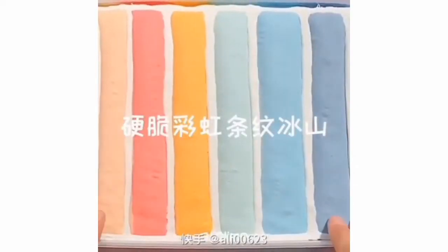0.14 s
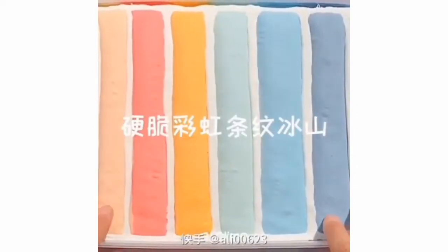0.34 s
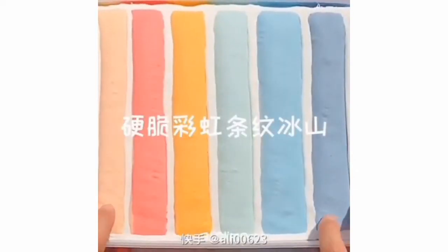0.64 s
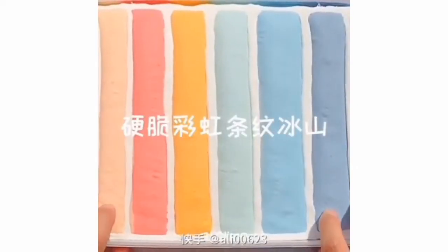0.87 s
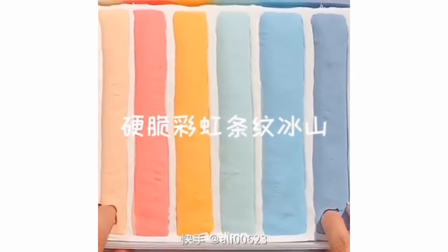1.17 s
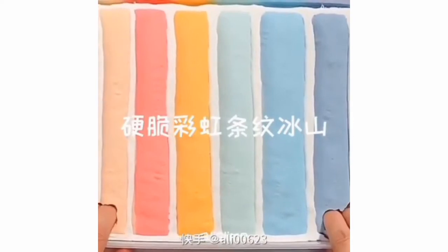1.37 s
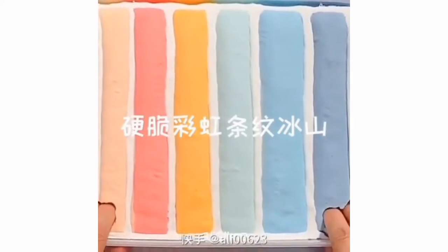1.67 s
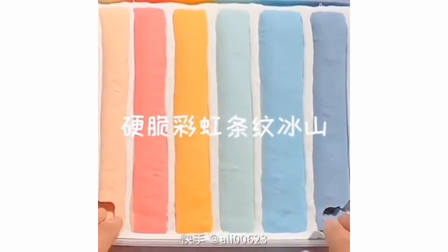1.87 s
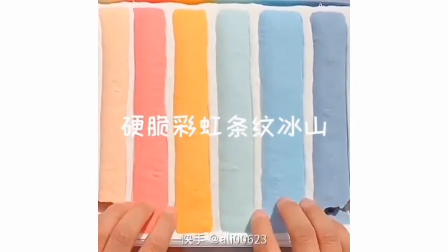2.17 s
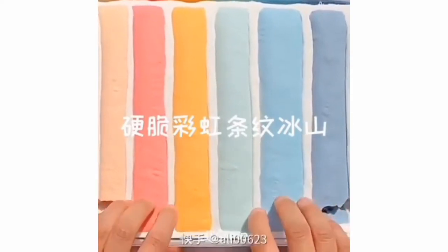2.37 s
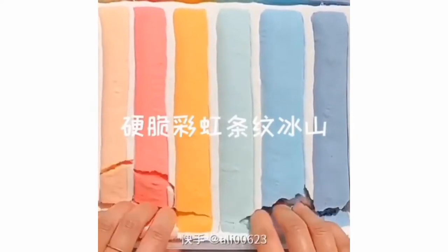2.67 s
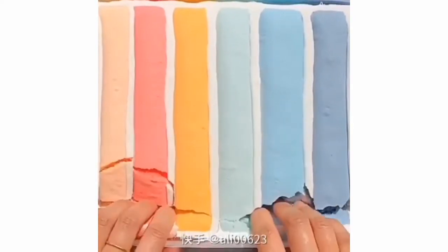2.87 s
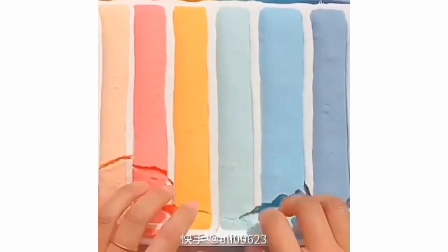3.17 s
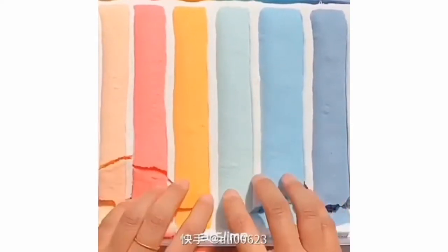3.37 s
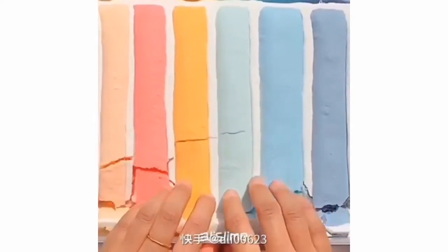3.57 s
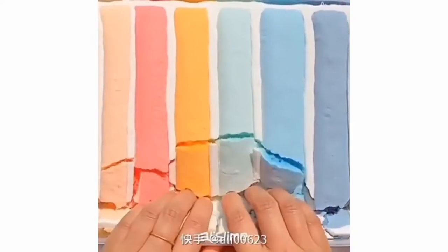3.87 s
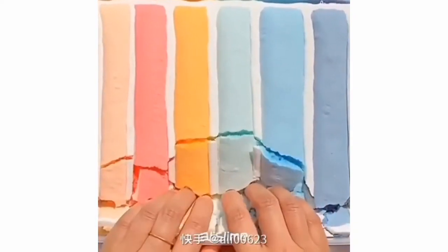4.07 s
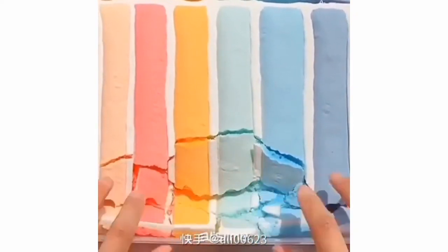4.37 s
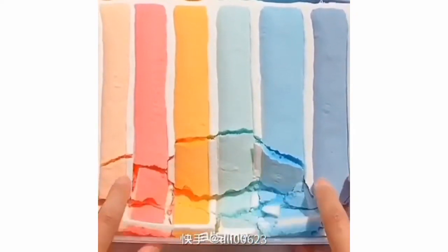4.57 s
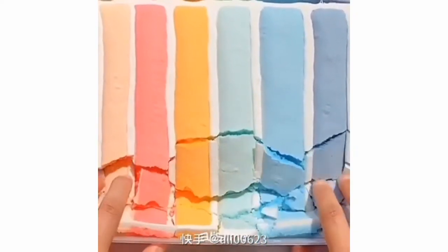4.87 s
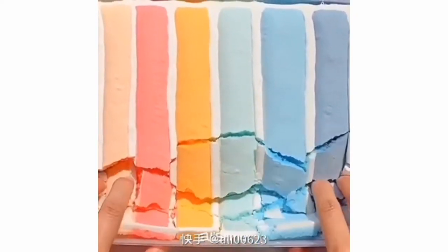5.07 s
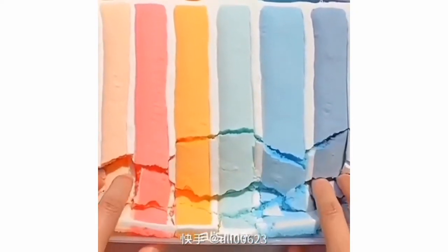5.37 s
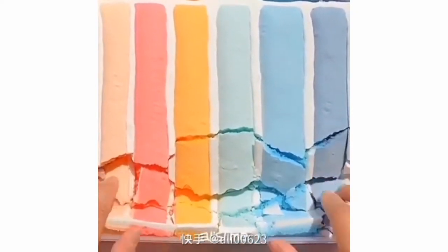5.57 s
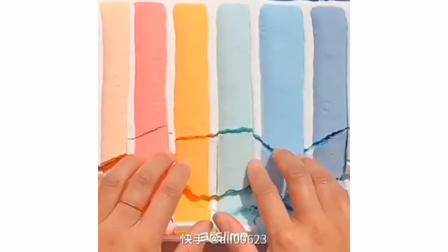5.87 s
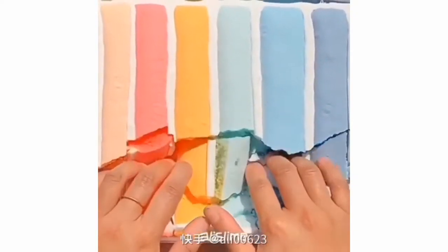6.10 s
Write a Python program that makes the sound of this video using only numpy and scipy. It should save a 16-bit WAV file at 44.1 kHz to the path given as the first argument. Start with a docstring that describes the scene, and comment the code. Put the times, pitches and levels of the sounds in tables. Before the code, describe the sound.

Very close in a quiet room, fingers press into a tray of crusted slime. A fine fizz swells, then the crust breaks in a cluster of crisp snaps and low thuds, crumbling away quickly. Five such bursts follow, separated by near silence with faint finger rubs and stray ticks. The table trembles softly underneath. Two close microphones give an intimate stereo picture.

```python
"""At a table in a quiet room, fingertips press five times into the dried crust of a tray of slime.
The crust fizzes under load and snaps: snaps are clicks stretched into falling chirps, with low thuds and hiss.
Crackle and fizz are thousands of tiny ringing flakes; rubbing and peeling fingers stir them between presses.
A low murmur is wide room hush when faint and the slab creaking near the fingers when loud.
The table wobbles near 70 Hz, and two close microphone ports hear it all over a soft hush."""
import sys
import numpy as np
from scipy import signal
from scipy.fft import rfft, irfft, next_fast_len
from scipy.io import wavfile

SR = 44100
rng = np.random.default_rng(int(sys.argv[2]) if len(sys.argv) > 2 else 0)


def inscribe(sig):
    """Save sig as 16-bit PCM at rate SR to the path in sys.argv[1].

    A 1-D sig is mono; a 2-D sig holds one channel per row.
    Samples are clipped to [-1, 1] before scaling.
    """
    pcm = np.round(np.clip(np.atleast_2d(sig).T, -1, 1) * 32767)
    wavfile.write(sys.argv[1], SR, pcm.astype(np.int16))


N = 275184  # samples in the scene

TRAVEL_S = 0.00602  # travel delay of 300 Hz; higher pitches take less


def crack(hz, octaves):
    """One fracture: a click coloured around hz whose treble travels fastest; peak 1, 64 samples of lead-in."""
    f = np.fft.rfftfreq(1024, 1 / SR) + 1
    colour = from_db(-12 * (np.log2(f / hz) / octaves) ** 2)
    # the second term moves the whole chirp earlier, to the front of the block
    travel = np.sqrt(300 * f) - 20 * f / np.sqrt(f[-1])
    wave = irfft(colour * np.exp(-4j * np.pi * TRAVEL_S * travel))
    return np.roll(wave, 64) / np.abs(wave).max()


# Snaps that stand out, levels before the small trims in snaps():
# (t/s, crack level/dB, crack f/Hz, thud f/Hz, thud level/dB, splinter hiss level/dB, tear length/s)
BIG_SNAPS = [(.51, -54, 1780, 288, -48, -73, 0.0058), (.854, -41, 1000, 630, -69.5, -66, .003),
             (.894, -36.5, 1260, 324, -39, -53, 0.0044), (.908, -35.5, 1197, 466, -32.5, -45.5, 0.0068),
             (.932, -39, 1660, 334, -51, -49, .01), (.946, -22.5, 1550, 319, -39, -31.5, 0.016),
             (.956, -35, 1620, 306, -23, -37, 0.0047), (.969, -32, 1243, 564, -35.5, -50, 0.0034),
             (.99, -43, 1490, 452, -39, -47, 0.019), (1.014, -22, 1552, 603, -30.5, -31.5, 0.0097),
             (1.088, -42.5, 1710, 554, -49, -62, .0083), (1.101, -45, 1250, 322, -40, -59.5, 0.0032),
             (1.498, -57, 1680, 384, -59.5, -74, 0.0087), (1.595, -50, 1430, 363, -53, -67.5, 0.01),
             (1.617, -51, 1200, 444, -47, -62, 0.0097), (1.644, -50.5, 1550, 460, -58, -57, 0.011),
             (1.872, -82, 860, 367, -48.5, -71, 0.006), (2.008, -50.5, 1445, 234, -40, -54.5, 0.0059),
             (2.156, -47, 1457, 410, -37, -54, 0.0032), (2.163, -34.5, 1230, 232, -37.5, -52, 0.0096),
             (2.175, -23.5, 1195, 344, -24.5, -40.5, .0043), (2.219, -24, 1171, 393, -21.5, -39.5, 0.0073),
             (2.228, -35, 1138, 407, -23, -38.5, 0.0031), (2.252, -18, 1417, 587, -24, -26, .012),
             (2.267, -29, 1193, 327, -20.5, -38.5, 0.0036), (2.306, -49.5, 1340, 345, -37.5, -62.5, 0.0047),
             (2.35, -47, 1480, 525, -42.5, -48, .0044), (3.073, -52.5, 1127, 273, -44, -65.5, .01),
             (3.14, -58, 1586, 248, -46, -63, 0.0058), (3.205, -53, 1553, 590, -48.5, -64, 0.0016),
             (3.266, -44.5, 1201, 313, -62, -74, 0.0029), (3.309, -49, 1260, 393, -41, -58.5, 0.0049),
             (3.363, -23.5, 1283, 320, -31.5, -37, 0.0086), (3.411, -17.5, 1500, 323, -18, -30.5, 0.011),
             (3.417, -16, 1317, 405, -17, -33, 0.0066), (3.438, -22, 1640, 323, -30.5, -40, 0.005),
             (3.443, -22, 1750, 324, -26, -38, .014), (3.463, -27, 1516, 313, -25, -35, 0.0067),
             (3.501, -31.5, 1060, 322, -33, -50.5, 0.0058), (3.521, -37.5, 1890, 340, -52.5, -53.5, .0039),
             (3.565, -51, 1480, 447, -56, -63, 0.019), (3.594, -58, 1310, 215.5, -43, -70.5, 0.0043),
             (3.825, -48.5, 937, 262, -51.5, -83, .006), (4.016, -46, 1184, 374, -48, -66.5, .017),
             (4.056, -49, 1136, 414, -48, -76, .011), (4.279, -54.5, 1080, 319, -32, -57.5, 0.005),
             (4.351, -55, 1750, 228, -56.5, -73, .0064), (4.528, -48.5, 1910, 340, -41.5, -58, 0.0043),
             (4.568, -36, 1418, 496, -42.5, -40, 0.007), (4.587, -22, 2130, 364, -30.5, -28, 0.0087),
             (4.599, -27, 1470, 353, -28, -48, 0.0061), (4.622, -31, 1138, 344, -31, -37.5, .0093),
             (4.629, -20, 985, 452, -22.5, -39, 0.0036), (4.639, -33.5, 1610, 346, -42.5, -45.5, 0.0057),
             (4.674, -19.5, 1164, 312, -18.5, -32.5, 0.0063), (4.745, -49, 1624, 313, -47.5, -63, 0.014),
             (4.825, -26, 1190, 315, -26.5, -34.5, 0.0039), (5.308, -67, 1984, 338, -59.5, -60, 0.006),
             (5.332, -48, 1110, 391, -49.5, -70.5, 0.0078), (5.584, -57, 1300, 428, -53.5, -72, 0.019),
             (5.703, -19.5, 1500, 360, -18, -28.5, 0.007), (5.712, -19, 894, 318, -19.5, -34, .0058),
             (5.729, -60, 1290, 327, -29, -52, 0.0049), (5.759, -49, 1680, 334, -39, -63, .007),
             (5.781, -40, 1290, 322, -49.5, -57, 0.0044), (5.804, -37, 1240, 377, -43, -50, 0.024),
             (5.819, -13.5, 1890, 428, -18.5, -27, 0.0033), (5.887, -30, 1200, 310, -36.5, -56, .004),
             (5.927, -37.5, 1440, 250, -45, -67, .003), (5.949, -52, 1410, 241, -47, -70, .004),
             (6.135, -45.5, 1240, 580, -63, -59, 0.0039)]
# Colour of fine fizz and splinters: (f/Hz, level/dB)
FIZZ_COLOUR = [(2000, -0.5), (3200, -0.5), (3830, 2.5), (4600, 0.5), (5600, -3.5), (6300, -2.5),
               (7200, -3.5), (8500, -1.5), (11000, -10), (12800, -8), (14000, -6)]
FRACTURE_GAP_S, THUD_LAG_S = 0.002, 0.0012  # mean gap between fractures; thud starts after the crack
# faint cracks have a narrower colour, strong ones the full width
FAINT_DB, FULL_DB, FAINT_OCTAVES, FULL_OCTAVES = -42, -28, 0.55, 0.71


def snaps(rows, count=10):
    """A tear is a row of fractures, led by the largest, with a thud of the slab and a puff of splinters."""
    cracks, thuds, puffs = np.zeros((3, N + SR))
    t = np.arange(SR // 12) / SR
    chance = rng.random((len(rows), 4, count))
    order = np.arange(count)
    for row, (when, size, sign, tint) in zip(rows, chance):
        s, crack_db, crack_hz, thud_hz, thud_db, hiss_db, length = row
        length = np.clip(length, 0.001, 0.03)
        late = (order + 0.8 * when * (order > 0)) * FRACTURE_GAP_S
        octaves = np.interp(crack_db, [FAINT_DB, FULL_DB], [FAINT_OCTAVES, FULL_OCTAVES])

        for k in np.flatnonzero(late < 0.8 * length):
            at = round((s + late[k]) * SR) - 64  # allow for the lead-in
            level_db = crack_db - 2.0 - 4.0 * size[k] * (k > 0)
            gain = from_db(level_db) * np.sign(sign[k] - 0.5)
            # each later piece has its own size, so its own pitch
            piece_hz = crack_hz * 2 ** (1.55 * (tint[k] - 0.5) * (k > 0))
            cracks[at:at + 1024] += gain * crack(piece_hz, octaves)

        rise_and_fade = t / (0.52 * length) * np.exp(1 - t / (0.46 * length))
        # the thud starts high and settles on the slab's pitch
        phase = 2 * np.pi * thud_hz * (t + 0.0012 * (1 - np.exp(-t / 0.003)))
        thud = rise_and_fade ** 2.43 * np.sin(phase + 2 * np.pi * sign[0])
        start = round((s + THUD_LAG_S) * SR)
        thuds[start:start + len(t)] += from_db(thud_db + 1.5) * thud

        start = round((s - 0.002) * SR)  # splinters fly just before the break
        puffs[start:start + len(t)] += (from_db(hiss_db - 3.5) * rise_and_fade) ** 2

    splinters = rms_one(flakes(grains(12000, spread_db=3.0), FIZZ_COLOUR)) * np.sqrt(puffs[:N])
    return cracks[:N] + thuds[:N] + splinters


SMALL_SNAPS_PER_S, SMALL_SPREAD_DB = 22, 5
SMALL_OVER_DB = (8, 9, -0.5)  # most that crack, thud and hiss are set over crackle, murmur and fizz
SMALL_UP_TO_DB = -56  # under more strain than this the small breaks grow no further


def small_snaps(load_db):
    """Small breaks come at random, and grow with the strain of the moment up to a limit."""
    count = int(SMALL_SNAPS_PER_S * N / SR)
    when, size, crack_pitch, thud_pitch, length = rng.random((count, 5)).T
    s = 0.01 + when * (N / SR - 0.02)
    strain_db = np.minimum(load_db[:, (s * SR).astype(int)], SMALL_UP_TO_DB)
    levels_db = strain_db + np.array(SMALL_OVER_DB)[:, None] - SMALL_SPREAD_DB * size
    crack_db, thud_db, hiss_db = levels_db
    crack_hz = 1100 + 700 * crack_pitch
    thud_hz = 230 + 270 * thud_pitch
    length_s = 0.004 + 0.01 * length ** 2
    return list(zip(s, crack_db, crack_hz, thud_hz, thud_db, hiss_db, length_s))


# Colour of the crackle in the middle of the range: (f/Hz, level/dB)
CRACKLE_COLOUR = [(300, -24.5), (700, 4.5), (1200, 6.5), (2000, 1.5), (3200, -9.5), (5000, -42.5),
                  (8000, -38.5)]


def loaded_crust(load_db):
    """Countless small fractures in clumps: crackle in the middle, fine fizz on top."""
    crackle_db, _, fizz_db = load_db
    slow_noise = through(rng.standard_normal(N), lambda hz: 1 / (1 + (hz / 40) ** 2))
    clumps = from_db(2.0 * rms_one(slow_noise))
    # a light touch rubs finely; under heavy load the crust crumbles in coarse shards
    coarse = np.clip((crackle_db + 62) / 14, 0, 1)
    rubbing = rms_one(flakes(grains(8000, spread_db=2.5), CRACKLE_COLOUR, cycles=19.0))
    shards = rms_one(clumps * flakes(grains(700, spread_db=5.0), CRACKLE_COLOUR, cycles=16.0))
    mix = np.sqrt(1 - 0.8 * coarse) * rubbing + np.sqrt(0.8 * coarse) * shards
    fine = rms_one(clumps * flakes(grains(14000, spread_db=-1.5), FIZZ_COLOUR, cycles=40.0))
    return from_db(crackle_db) * mix + from_db(fizz_db) * fine


# Colour of the low murmur: (f/Hz, level/dB)
MURMUR_COLOUR = [(100, -4), (200, 3.5), (330, 2), (500, -2), (700, -5.5), (1100, -48.5)]


def low_murmur(load_db):
    """When faint, mostly the wide hush of the room; when loud, the slab creaking near the fingers."""
    murmur_db = load_db[1]
    mid, side = (rms_one(bending(grains(900, spread_db=3.5), MURMUR_COLOUR, TRAVEL_S)) for _ in range(2))
    wide_db = -np.clip(0.45 * (murmur_db + 66), 0, 12)  # louder is narrower
    return from_db(murmur_db) * spread(mid, from_db(wide_db) * side)


# Strain of the crust through each of the five presses:
# (t/s, crackle level/dB, low murmur level/dB, fizz level/dB)
PRESS_CURVES = [
    [(.27, -95, -85, -81), (.32, -88, -96, -74.5), (.52, -75.5, -84, -65.5), (.66, -70, -75, -61.5),
     (.72, -60, -65, -54), (.78, -59, -63, -53), (.86, -63, -69, -60.5), (.96, -49.5, -43, -47),
     (1.15, -64, -64, -65.5), (1.21, -74, -63.5, -80), (1.31, -87, -83, -100)],
    [(1.98, -97, -85, -80), (2.02, -75, -69, -69.5), (2.14, -67, -72.5, -61.5), (2.25, -48, -52.5, -45.5),
     (2.3, -52, -51.5, -53.5), (2.48, -72, -65, -80), (2.61, -81.5, -69, -101)],
    [(3.05, -91, -84.5, -90), (3.12, -76, -65.5, -77), (3.2, -69, -67.5, -72), (3.27, -63, -64, -64),
     (3.3, -57, -56, -55), (3.4, -52, -52, -51), (3.51, -47, -50, -54), (3.54, -58.5, -57, -63),
     (3.62, -66.5, -60, -95), (3.78, -86.5, -73.5, -100)],
    [(4.4, -78, -76.5, -74), (4.45, -68.5, -67.5, -67.5), (4.56, -47, -51, -49), (4.66, -54, -49, -49),
     (4.72, -50, -45, -54), (4.77, -53, -59, -56.5), (4.83, -55, -50, -55), (4.9, -75, -64, -88),
     (4.96, -66.5, -64.5, -72.5), (5.05, -90, -74, -99)],
    [(5.51, -85, -86, -81), (5.58, -66.5, -63.5, -68.5), (5.64, -64, -62.5, -68.5), (5.7, -51, -51, -43),
     (5.77, -56, -49, -54), (5.84, -50, -49, -51), (5.9, -56, -52, -57), (6.0, -68.5, -62, -68.5),
     (6.06, -73.5, -70.5, -82), (6.12, -77, -78, -95)],
]
# Fingers rub or peel off: (t/s, held/s, crackle level/dB, low murmur level/dB, fizz level/dB)
FINGER_RUBS = [(.18, 0.024, -76.5, -66, -94), (.52, .04, -78, -63, -82), (1.601, 0.056, -65, -65, -70),
               (1.88, 0.017, -75.5, -64, -84), (2.719, 0.027, -63.5, -65.5, -70.5),
               (2.8, 0.11, -74, -72.5, -73), (3.09, 0.017, -88, -59, -85),
               (4.008, 0.048, -59.5, -57, -62.5), (4.27, 0.024, -73.5, -62.5, -75.5),
               (4.36, 0.0081, -70.5, -66.5, -72.5), (5.33, .025, -63, -60, -70.5),
               (6.15, .1, -62.5, -59, -64.5)]
RUB_RISE_DB_PER_S, RUB_FALL_DB_PER_S = 292, 341
# the triples below: crackle, murmur, fizz
REST_DB = (-87.5, -73.5, -99.5)  # steady level under everything
CRUMBLE_DB = (-20.5, -16.5, -14.5)  # after a snap, against its crack, thud and hiss
CRUMBLE_T60_S = (0.09, 0.13, 0.24)  # time to sink 60 dB
STRAIN_DB, STRAIN_T60_S = -1, 0.055  # swell before a snap: level against the crumble, time to climb 60 dB


def load():
    """Power of crackle, murmur and fizz adds up from rest, presses, rubs and the time around big snaps; in dB."""
    power = from_db(REST_DB)[:, None] ** 2 * np.ones(N)
    t = np.arange(N) / SR
    for press in PRESS_CURVES:
        pressed = (t > press[0][0]) & (t < press[-1][0])
        power += from_db(in_time(press)) ** 2 * pressed
    for s, held, *db in FINGER_RUBS:
        shape_db = swell(s, held, RUB_RISE_DB_PER_S, RUB_FALL_DB_PER_S)
        power += from_db(db)[:, None] ** 2 * from_db(shape_db) ** 2

    rows = np.array(BIG_SNAPS)
    at = (rows[:, 0] * SR).astype(int)
    for layer, column in enumerate([1, 4, 5]):  # crack, thud and hiss levels
        kicks = np.zeros(N)
        kicks[at] = from_db(rows[:, column] + CRUMBLE_DB[layer]) ** 2
        crumble = dying(kicks, CRUMBLE_T60_S[layer])
        strain = dying(kicks[::-1], STRAIN_T60_S)[::-1]  # run backwards, so it climbs to the snap
        power[layer] += crumble + from_db(STRAIN_DB) ** 2 * strain
    return 10 * np.log10(power)


# Colour of the table's trembling: (f/Hz, level/dB)
TABLE_COLOUR = [(20, -40), (40, 1), (60, 8), (70, 11), (82, -0.5), (120, 2), (200, -46)]
# The hands shove the table: (t/s, level/dB)
TABLE_SHOVES = [(0.0, -57), (.1, -58), (.57, -63), (.96, -48), (1.04, -58), (1.94, -62.5), (2.26, -50),
                (2.36, -55.5), (2.66, -60), (2.88, -66), (3.09, -61.5), (3.44, -48.5), (3.58, -57),
                (3.7, -60), (4.31, -61.5), (4.59, -48), (4.72, -48), (4.86, -52), (5.02, -64.5),
                (5.76, -57), (5.84, -50)]
SHOVE_RISE_DB_PER_S, SHOVE_FALL_DB_PER_S, TABLE_REST_DB = 350, 129, -66.5
# one jolt late in the first press sets the table ringing; the level is before the soft start
JOLT_AT_S, JOLT_DB, JOLT_HZ, JOLT_T60_S = 1.05, -39, 72, 0.6


def table():
    """The table trembles at its low mode and rings out once after a jolt."""
    tremble = rms_one(through(rng.standard_normal(N), lambda hz: from_db(at_hz(TABLE_COLOUR, hz))))
    t = np.maximum(np.arange(N) / SR - JOLT_AT_S, 0)
    fade = from_db(JOLT_DB - 60 * t / JOLT_T60_S)
    soft_start = 1 - np.exp(-t / 0.025)
    jolt = fade * soft_start * np.sin(2 * np.pi * JOLT_HZ * t)
    power = from_db(TABLE_REST_DB) ** 2
    for at, db in TABLE_SHOVES:
        power = power + from_db(db + swell(at, 0, SHOVE_RISE_DB_PER_S, SHOVE_FALL_DB_PER_S)) ** 2
    return np.sqrt(power) * tremble + jolt


# Left port over right port: (f/Hz, level/dB)
PORT_TILT = [(60, 0), (130, -.5), (280, -3), (620, -5.5), (1340, 0.7), (2900, -1), (6400, -0.4),
             (13800, 0.5)]
# Phase by which the left port leads: (f/Hz, lead/radians)
PORT_PHASE = [(100, .05), (350, .15), (700, .55), (1210, .05), (3000, .4), (4650, 1.5), (5300, .2),
              (9000, 1.5), (10500, .2)]
# Scattered sound that differs between the ports: (f/Hz, level/dB)
PORT_SCATTER = [(30, -18), (100, -25), (350, -27), (700, -19), (1300, -25), (2500, -13), (5000, -5),
                (9000, -3), (13000, -8)]


def ports(x, shift_hz=60):
    """Two ports hear one wave with a tilt in level and phase, plus ever-changing scatter from hands and tray."""
    def left(hz):
        return from_db(at_hz(PORT_TILT, hz) / 2) * np.exp(0.5j * at_hz(PORT_PHASE, hz))

    shifting = rms_one(through(rng.standard_normal(N), lambda hz: 1 / (1 + (hz / shift_hz) ** 2)))
    scatter = through(x * shifting, lambda hz: from_db(at_hz(PORT_SCATTER, hz)))
    right_wave = through(x, lambda hz: 1 / left(hz))
    return np.array([through(x, left) + scatter, right_wave - scatter])


ROOM_T60_S, ROOM_DB, WALL_CUT_HZ = 0.25, -16, 5000  # level is before widening


def room(x):
    """Dense dull reflections: noise that dies away, of unit energy before it is set in level and widened."""
    t = np.arange(SR // 2) / SR
    echo = rng.standard_normal((2, len(t))) * from_db(-60 * t / ROOM_T60_S)
    echo = through(echo, lambda hz: 1 / (1 + 1j * hz / WALL_CUT_HZ))
    mid, side = (signal.fftconvolve(x, e / np.linalg.norm(e))[:N] for e in echo)
    return from_db(ROOM_DB) * spread(mid, side)


# Colour of the room's hush: (f/Hz, relative level/dB)
HUSH_COLOUR = [(53, -30.5), (90, -3), (126, -16.5), (270, -14), (615, -22.5), (958, -31.5), (1130, -27.5),
               (1840, -37.5), (2230, -37.5), (3260, -39.5), (4380, -38.5), (14000, -56)]
HUSH_DB = -71  # before widening


def background():
    """The hush of the room: two coloured noises, spread all around."""
    noise = rng.standard_normal((2, N))
    mid, side = rms_one(through(noise, lambda hz: from_db(at_hz(HUSH_COLOUR, hz))))
    return from_db(HUSH_DB) * spread(mid, side)


# Width of sound from all around: (f/Hz, side over mid level/dB)
SIDE_OVER_MID = [(60, -20.5), (110, -19.5), (200, -8.5), (370, -5), (670, 4.5), (1230, -0.5), (2260, -7),
                 (4130, 2.5), (7560, -4), (13800, 1)]


def spread(mid, side):
    """Left and right of a sound from all around, given two unrelated versions of it."""
    side = through(side, lambda hz: from_db(at_hz(SIDE_OVER_MID, hz)))
    return np.array([mid + side, mid - side])


def flakes(fractures, spectrum, cycles=31.0, count=28):
    """Fractures are dealt to flakes of many sizes; each rings at its own pitch, sinking 60 dB in some cycles."""
    dealt, out = rng.integers(0, count, N), np.zeros(N)
    for k, hz in enumerate(np.geomspace(spectrum[0][0], spectrum[-1][0], count)):
        r = from_db(-60 * hz / (cycles * SR))  # loss per sample
        w = 2 * np.pi * hz / SR
        hits = fractures * (dealt == k) + 1e-18
        ring = signal.lfilter([1, 0, -1], [1, -2 * r * np.cos(w), r * r], hits)
        out += from_db(at_hz(spectrum, hz)) * np.sqrt(hz) * rms_one(ring)
    return out


def grains(per_s, spread_db):
    """Tiny fractures at random moments, of uneven size and either sign."""
    sizes = from_db(spread_db * np.minimum(rng.exponential(1, N), 4)) * rng.choice([-1, 1], N)
    return sizes * (rng.random(N) < per_s / SR)


def bending(x, spectrum, travel_s):
    """Bending waves run at a speed growing as the root of pitch: a click arrives as a falling chirp."""
    def response(hz):
        return from_db(at_hz(spectrum, hz)) * np.exp(-4j * np.pi * travel_s * np.sqrt(300 * hz))
    return through(x, response)


def swell(start, held, rise, fall):
    """dB under the top: climbs at rise dB/s until start, holds, sinks at fall dB/s."""
    t = np.arange(N) / SR
    return -rise * np.maximum(start - t, 0) - fall * np.maximum(t - start - held, 0)


def dying(kicks, t60):
    """Power that sinks 60 dB in t60 seconds after each kick."""
    return signal.lfilter([1], [1, -from_db(-120 / (t60 * SR))], kicks + 1e-18)


def from_db(db):
    """Decibels to gain."""
    return 10 ** (np.asarray(db) / 20)


def rms_one(x):
    """Scale to unit rms."""
    return x / np.sqrt(np.mean(x ** 2) + 1e-20)


def in_time(rows):
    """Columns of a curve table at every sample."""
    s, *columns = np.transpose(rows)
    return [np.interp(np.arange(N) / SR, s, c) for c in columns]


def at_hz(points, hz):
    """A spectrum table read on a log frequency axis."""
    f, values = np.array(points).T
    return np.interp(np.log(hz), np.log(np.maximum(f, 1)), values)


def through(x, response):
    """Filter by a response given as a function of Hz."""
    size = next_fast_len(x.shape[-1] + 4096)
    hz = np.fft.rfftfreq(size, 1 / SR) + 1
    return irfft(rfft(x, size) * response(hz), size)[..., :x.shape[-1]]


def scene():
    """Crust, table, murmur, room and hush together at the microphone."""
    load_db = load()
    snap = snaps(BIG_SNAPS + small_snaps(load_db))
    close = ports(snap + loaded_crust(load_db) + table())
    return close + low_murmur(load_db) + room(snap) + background()


CUTOFF_HZ = 13000


def record(dry):
    """A steep low-pass filter cuts the top, 45 dB down a little above the cutoff."""
    low_pass = signal.cheby2(12, 45, 1.07 * CUTOFF_HZ, fs=SR, output="sos")
    return signal.sosfilt(low_pass, dry)


dry = scene()
out = record(dry)
inscribe(out)
```